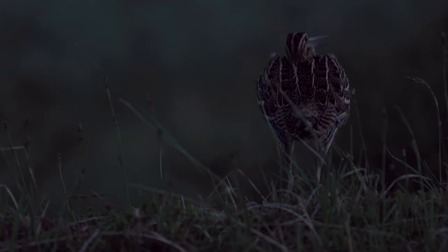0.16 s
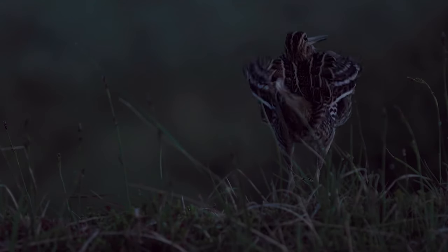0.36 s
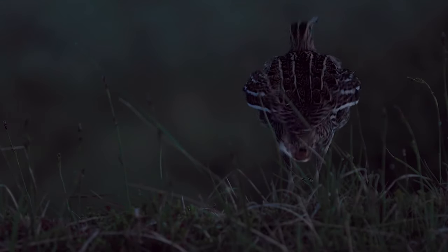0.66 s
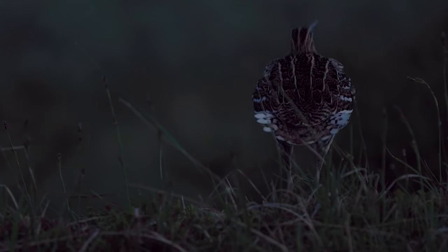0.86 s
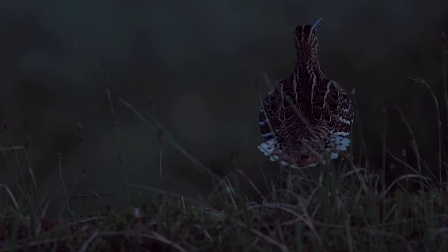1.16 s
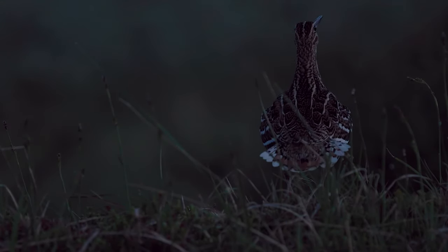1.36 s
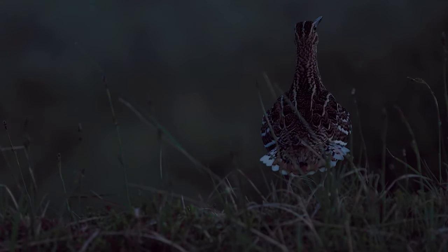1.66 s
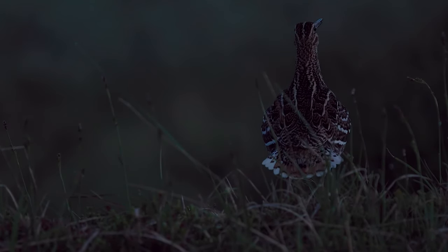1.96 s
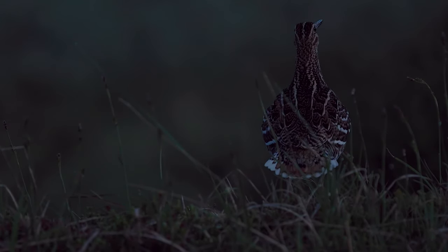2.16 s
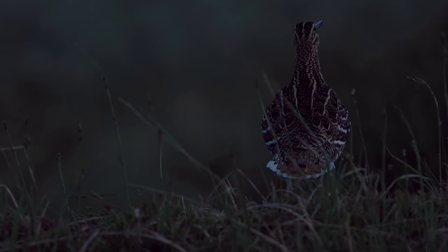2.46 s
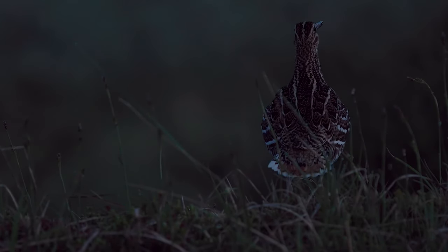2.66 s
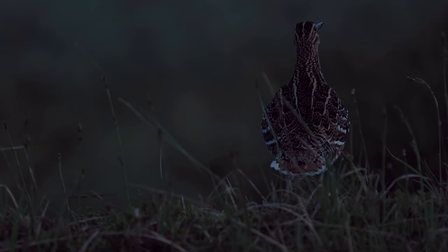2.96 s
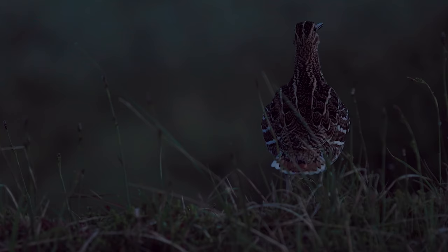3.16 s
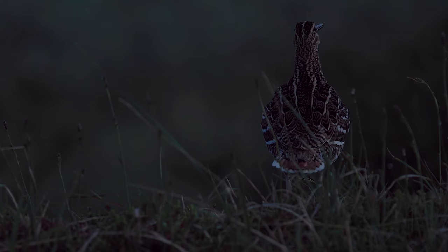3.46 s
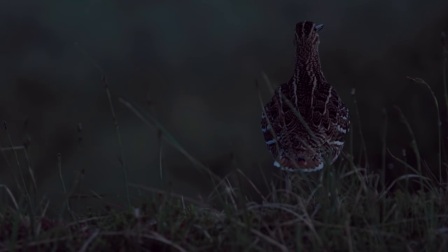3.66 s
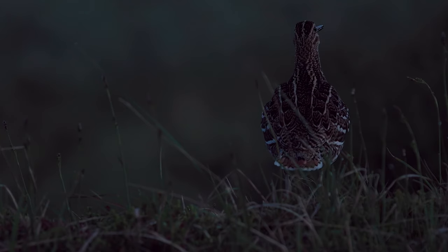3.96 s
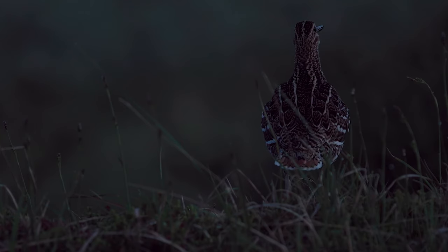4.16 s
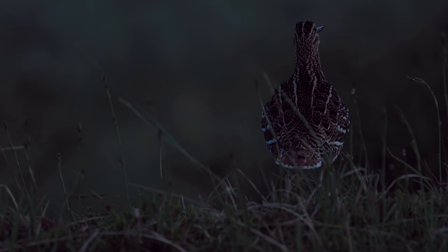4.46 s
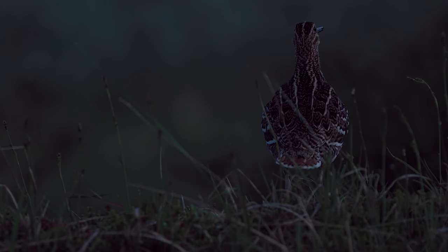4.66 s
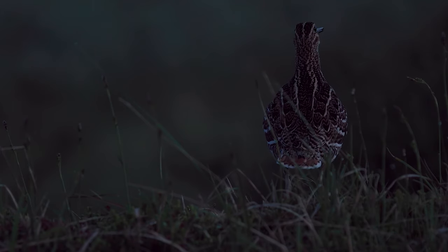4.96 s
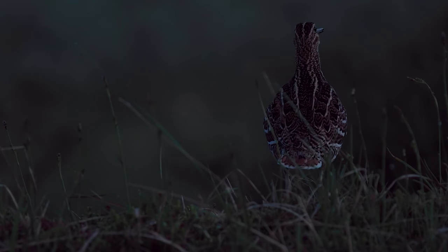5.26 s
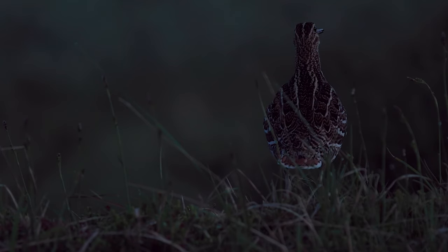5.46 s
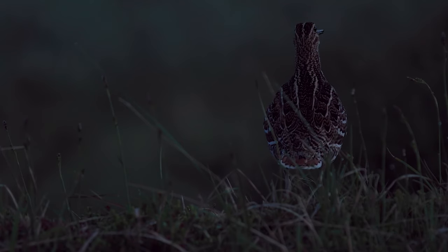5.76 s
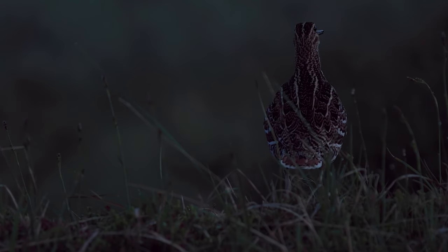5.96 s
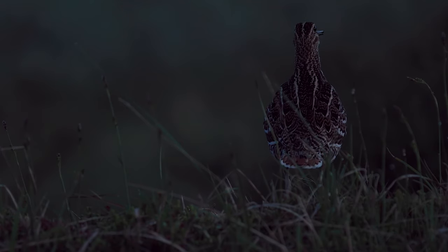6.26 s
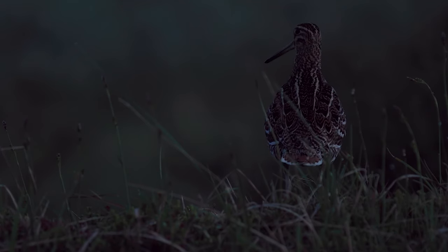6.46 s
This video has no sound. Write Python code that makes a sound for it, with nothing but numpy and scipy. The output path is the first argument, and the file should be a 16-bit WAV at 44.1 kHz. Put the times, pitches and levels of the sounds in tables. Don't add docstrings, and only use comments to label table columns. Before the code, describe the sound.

On an open mire at dusk, a long-billed wader already mid-song snaps dry, ringing clicks faster and faster, then a quick triplet, one last snap, chirps and a thin warble. A second and third male repeat the accelerating bout, with gulps and low chest beats. Far twittering thins, a low breeze rises, and a softer bout of clicks comes last. Two spaced microphones give wide stereo.

```python
import sys
import numpy as np
from scipy import signal
from scipy.io import wavfile
from scipy.ndimage import uniform_filter1d, minimum_filter1d

SR = 44100
rng = np.random.default_rng(int(sys.argv[2]) if len(sys.argv) > 2 else 0)


def pcm_store(signal):
    levels = np.round(np.clip(np.atleast_2d(signal), -1, 1) * 32767)
    wavfile.write(sys.argv[1], SR, levels.astype(np.int16).T)


def volts_from_decibels(level):
    exponent = np.asarray(level, float) / 20
    return 10 ** exponent


N = 291489

# (t/s, rumble level/dB, far chorus level/dB)
ACTIVITY = [(0, -39, -38), (.47, -40.5, -42.5), (.9, -45, -39.5), (1.3, -43, -40), (1.6, -50.5, -40),
            (2.65, -49, -44), (2.9, -42, -45.5), (3.15, -48.5, -41), (3.4, -43, -44.5), (3.9, -50.5, -55.5),
            (4.1, -44, -51.5), (4.599, -50.5, -59), (5.1, -44.5, -58), (5.3, -36.5, -51.5),
            (5.6, -39.5, -49), (5.85, -36, -44), (6.2, -44, -48.5), (6.61, -43.5, -58)]
# (f/Hz, level/dB)
RUMBLE = [(35, -47), (60, -8), (120, 1.8), (270, -13), (450, -33.5), (700, -60)]
BREEZE = [(12, 10), (28, 15), (60, -4), (120, -41.5)]
HISS = [(210, 3), (350, -1.5), (613, -3.5), (1140, -1), (1940, -10), (2980, -6.5), (5750, -27.5),
        (16000, -27)]
CHORUS = [(1500, -28), (2500, -5), (4000, 0.5), (5500, -8), (8000, -18), (13000, -26)]
HISS_DB = -53

# (t/s, peak level/dB)
BEATS = [(0.014, -29.5), (0.068, -30), (0.095, -28), (0.144, -30), (0.168, -29.5), (0.194, -28),
         (0.271, -28), (0.321, -28), (0.369, -30), (0.395, -27), (0.535, -39), (0.575, -30), (0.671, -28),
         (0.735, -29), (0.761, -30), (0.821, -34), (0.847, -33), (0.899, -36), (0.972, -34), (1.036, -36),
         (1.081, -35), (1.143, -34), (1.188, -33.5), (1.231, -33), (1.262, -30), (1.398, -38), (1.462, -32),
         (1.496, -36), (1.76, -40), (1.846, -33), (1.947, -41), (2.008, -33), (2.146, -31.5), (2.268, -33),
         (2.338, -44), (2.374, -33), (2.465, -33), (2.531, -40), (2.555, -33), (2.612, -41), (2.64, -38),
         (2.687, -40), (2.712, -37), (2.753, -36), (2.812, -32), (2.911, -37), (3.072, -40)]
THUD_HZ, THUD_DB = 105, -32

# (t/s, length/s, from f/Hz, to f/Hz, level/dB)
LEFT = [(1.145, 0.034, 3700, 3410, -38.5), (1.548, 0.042, 3780, 3590, -38), (1.491, 0.03, 4750, 4100, -37),
        (0.74, 0.052, 4100, 3620, -45), (0.871, 0.036, 2900, 2720, -46), (0.913, 0.023, 5250, 4750, -44),
        (0.954, 0.016, 4950, 4350, -32), (0.965, 0.042, 2900, 2820, -44.5),
        (1.048, 0.047, 3200, 3070, -44.5), (1.407, 0.019, 3950, 4060, -32.5),
        (1.441, 0.009, 5050, 4300, -38), (1.458, 0.012, 4900, 4150, -39), (1.472, 0.015, 5200, 4450, -31),
        (1.499, 0.03, 1860, 1876, -49), (1.655, 0.02, 2000, 1890, -50), (1.696, 0.015, 5600, 4340, -31.5),
        (1.709, 0.046, 2850, 2460, -46), (1.712, 0.048, 1960, 1850, -52), (.23, .035, 2450, 2350, -49),
        (.316, .04, 2850, 2700, -46), (.12, .07, 2300, 1950, -49), (.605, .02, 4950, 4850, -44),
        (1.405, .06, 2700, 2650, -49), (2.97, .04, 2700, 2700, -52), (3.15, .05, 3200, 2750, -54),
        (1.923, 0.025, 2080, 1920, -50), (1.972, 0.018, 3750, 3970, -41), (1.63, 0.02, 4150, 4040, -37.5),
        (1.658, 0.08, 4050, 4260, -38), (1.89, 0.028, 3950, 4100, -38), (1.889, 0.049, 3050, 2930, -42.5),
        (2.8, 0.04, 3950, 4000, -51), (3.715, 0.06, 4650, 4700, -57), (0.305, 0.013, 4500, 4150, -30.5),
        (0.404, 0.011, 5300, 4850, -32), (0.025, 0.038, 3650, 4050, -38), (0.18, 0.021, 3080, 3320, -45),
        (3.873, .117, 3170, 3044, -51.5), (4.292, 0.11, 2655, 2770, -51)]
AHEAD = [(.372, 0.055, 2220, 2250, -40), (0.409, 0.046, 3350, 3000, -37.5), (3.675, 0.063, 3800, 3930, -47),
         (3.845, 0.059, 3820, 3830, -49.5), (5.016, 0.043, 3790, 3700, -50.5),
         (5.088, 0.026, 4380, 4100, -49.5), (5.158, .034, 4700, 4260, -50.5),
         (5.617, 0.031, 4000, 3960, -44.5), (5.768, 0.02, 5000, 4700, -41), (5.2, .06, 3250, 2900, -50),
         (5.31, 0.1, 4020, 4660, -55), (3.8, 0.049, 3300, 3000, -55), (6.02, 0.035, 2900, 2570, -55),
         (6.09, 0.02, 3100, 3150, -48), (6.53, 0.015, 3150, 3400, -50), (6.56, 0.022, 3280, 3130, -43),
         (6.19, 0.013, 5300, 4650, -45), (6.076, 0.026, 5000, 4770, -46), (6.208, 0.02, 4850, 4550, -47),
         (6.53, 0.035, 4500, 4430, -52)]
RIGHT = [(1.478, 0.081, 3240, 2700, -46), (1.951, 0.3, 3310, 3160, -57), (2.142, 0.22, 3250, 3170, -51),
         (2.538, 0.038, 4600, 4150, -53), (2.6, 0.048, 4500, 4300, -48), (.48, .05, 2700, 2800, -51),
         (5.73, .14, 2450, 2400, -58), (2.92, .04, 4330, 4180, -48), (2.98, 0.07, 3850, 3650, -54),
         (2.7, 0.047, 2700, 2800, -52), (3.445, 0.055, 3400, 2950, -54.5), (3.325, 0.053, 4400, 4700, -53),
         (3.24, 0.025, 4900, 4750, -47), (3.99, 0.06, 2950, 2400, -54.5), (3.915, 0.035, 4050, 3950, -54),
         (4.005, 0.025, 3950, 3550, -55), (3.5, 0.035, 3850, 3600, -55), (4.3, 0.04, 4400, 4000, -58),
         (4.035, 0.028, 1820, 1820, -54), (3.615, 0.018, 5200, 4900, -48), (3.575, 0.071, 4400, 3700, -46),
         (3.311, .11, 1750, 1710, -50.5), (3.199, 0.1, 3300, 2900, -55), (3.941, 0.062, 3890, 3860, -47.5),
         (4.194, 0.059, 3790, 3850, -48), (4.394, 0.063, 4130, 3900, -46.5),
         (6.21, 0.062, 3360, 3100, -52.5)]
FAR_RIGHT = [(4.661, 0.073, 3900, 3770, -52), (4.739, .25, 2140, 2000, -58), (4.75, 0.24, 4230, 3960, -62),
             (4.765, 0.075, 3450, 3550, -61), (4.82, 0.12, 3370, 3480, -62),
             (4.845, 0.065, 2940, 2920, -63), (4.94, 0.053, 3150, 2910, -63),
             (4.67, 0.045, 2850, 2790, -61), (4.299, 0.19, 3130, 3340, -62), (5.13, 0.065, 3750, 3680, -52),
             (5.3, 0.07, 2730, 2350, -52.5), (5.37, 0.15, 2375, 2310, -53), (5.62, .04, 4320, 4280, -47),
             (5.93, .065, 2700, 3450, -52), (5.75, .025, 4250, 3950, -47), (5.88, .03, 4350, 4000, -47),
             (5.78, .03, 3450, 3200, -52), (5.81, .04, 3250, 3700, -55), (6.16, .03, 4230, 4330, -55),
             (5.475, 0.055, 3000, 2700, -58), (5.53, 0.06, 2960, 3550, -60), (5.457, .054, 3980, 3850, -55),
             (5.574, 0.074, 2280, 2160, -58), (5.799, .15, 1980, 1860, -62.5),
             (5.896, 0.093, 5000, 5110, -43.5), (6.318, 0.065, 3300, 3060, -51.5),
             (6.45, .12, 2180, 2190, -60)]
NOTE_LAGS = (28, 8.5, -13, -27)
NOTE_ARCH, LONG_NOTE_S = 0.0459, .095
PAN_DB_PER_LAG = 0.2872

# (right microphone lag/samples, snap left over right/dB, bill brightness/dB,
# gulp level/dB, flourish level/dB)
MALES = [
    (3.003, 5.5, -32, -14, -1.5),
    (11.75, 13, 2, -20, -1.5),
    (26.67, 17.5, -1.5, -26, -3.5),
]
# (t/s, throat ring f/Hz, level/dB)
FIRST_BOUT = [
    (0.0712, 4560, -12),
    (0.1456, 4430, -12),
    (0.2124, 4070, -13),
    (0.2717, 3700, -14.5),
    (0.3229, 2080, -25.5),
    (0.4446, 4770, -13.5),
    (0.4679, 5100, -16.5),
    (0.4861, 4870, -17),
    (0.5837, 4230, -10),
]
SECOND_BOUT = [(0.1294, 4310, -14), (0.282, 4940, -9.5), (0.417, 5360, -7), (0.538, 5790, -8),
               (0.642, 5750, -7), (0.7355, 5520, -10), (0.8221, 5270, -9.5), (0.9014, 5150, -9.5),
               (0.974, 4840, -13.5), (1.0374, 4530, -14.5), (1.094, 4070, -18), (1.1446, 2480, -28.5),
               (1.1907, 1610, -56), (1.2332, 2000, -54), (1.265, 5680, -13.5), (1.287, 5070, -21.5),
               (1.3044, 4940, -21), (1.403, 4230, -15.5)]
THIRD_BOUT = [(1.6315, 4230, -36), (1.7614, 3920, -13.5), (1.9482, 4300, -12), (2.0953, 4810, -10),
              (2.2251, 5170, -9), (2.341, 5460, -8.5), (2.4402, 5330, -8), (2.5311, 5080, -9.5),
              (2.6147, 4830, -12), (2.6901, 4530, -15), (2.7572, 4260, -17.5), (2.8153, 3730, -20),
              (2.8673, 2680, -23.5), (2.914, 1900, -39.5), (2.9561, 2110, -45.5), (2.989, 5150, -15.5),
              (3.011, 4930, -25), (3.0287, 4790, -22.5), (3.1298, 5300, -16)]
FOURTH_BOUT = [(5.219, 3980, -29), (5.4155, 4250, -27), (5.5672, 4680, -26.5), (5.7021, 4930, -25.5),
               (5.8238, 5220, -27), (5.932, 5500, -30.5), (6.0299, 5240, -26.5), (6.119, 5040, -28.5),
               (6.202, 4900, -29), (6.278, 4600, -31), (6.3467, 4200, -33), (6.4087, 3900, -34),
               (6.4623, 2700, -45)]
STRAY_SNAPS = [
    (5.684, 2080, -29.5),
    (5.7238, 1845, -37),
]
SINGERS = [
    (0, -3, 0, .76, 1.055),
    (1, 4, 0, 1.612, .955),
    (2, 5, 2, 3.33, 1),
    (0, 5, 2, None, 1),
    (1, -9, 0, None, 1),
]
CRACK_DB = [-5, -2.5, -6.5, -28, -14.5]
# (slope/dB per kHz), zero at 4.5 kHz
CRACK_DB_PER_KHZ = [-1.5, -4.5, -3]
GAPE_UNDER_HZ, GAPE_DB_PER_SNAP = 3000, -3.0
LEAD_S = .0006

FILL, STOP_S, LONGEST_WAIT_S = .47, .011, 0.15
LEAD_DB = [-31, -20.5, -21.5, -22.5, -20]
TURN = (0.33, 0.58)
SLIDE, HOOK, SAG = (1.0, 1.0, 1.055), (1.04, .9, 1.085), (0.975, 0.99, 1.005)
HOOK_HZ, SAG_PER_SNAP, SAG_DB_PER_SNAP = 4600, 0.062, -3.2
SWELL_DB = 4
TOP = [(1.07, 0.91, 1.11), (1.16, 0.97, 1.11), (1.05, 0.93, 1.14)]
DROP = [(1.14, 1.02, 1), (1.0, 0.97, 0.95), (1.17, 1.04, 1)]

# (t/s, peak level/dB)
GULPS = [(0.166, -33.5), (0.31, -33.5), (0.361, -36), (0.384, -28.5), (0.403, -36), (0.421, -30.5),
         (0.549, -35.5), (0.654, -31.5), (0.685, -29.5), (0.745, -34.5), (0.831, -35.5), (0.91, -36.5),
         (1.202, -39), (1.221, -35.5), (1.24, -36.5), (1.47, -34), (1.504, -36), (1.585, -37), (1.777, -35),
         (1.992, -35.5), (2.134, -37.5), (2.879, -37), (3.078, -40), (5.261, -42), (5.328, -42),
         (5.686, -40.5), (5.9, -47), (2.691, -41)]
LATE_S, LATE_TUNE = 5, 1.8

# (t/s from it, length/s, from f/Hz, to f/Hz, level/dB)
CHIRPS = [
    (-.089, .07, 7010, 4510, -33.5),
    (-.03, 0.022, 5560, 5870, -30),
    (.047, 0.017, 6640, 4280, -35.5),
    (0.063, 0.012, 5390, 4350, -39.5),
    (.081, 0.019, 4740, 6480, -36.5),
    (.148, 0.013, 5970, 5450, -33.5),
    (0.159, .034, 5220, 5160, -35),
]
# (t/s from its start, f/Hz)
SWOOPS = [
    [(0, 3835), (.05, 3590), (.096, 5370), (.108, 5530), (.158, 5470), (.198, 4870), (.253, 3516),
     (.292, 3214)],
    [(.294, 2804), (.307, 2670), (.358, 3210), (.4, 3260), (.499, 2836), (.514, 2565), (.545, 2770),
     (.557, 2460)],
]
SWOOP_DB, PIP_DB = (-49.5, -47.5), (-44, -47.5, -55)
PIP_S, PIP_GAP_S, PIP_LENGTH_S, PIP_HZ = .565, 0.063, 0.044, (2424, 2680)
DB_PER_KHZ = 5
UNDER, UNDER_DB = .755, -4.5
UNDER_REST_S = .11, .225

# (t/s, ring f/Hz, peak level/dB)
BACK_SNAPS = [(1.046, 5020, -29), (1.147, 5550, -25.5), (1.414, 7600, -41), (1.435, 7440, -43),
              (1.5482, 5850, -26.5), (1.593, 7940, -43), (1.6294, 6800, -33.5), (1.701, 7180, -35),
              (5.234, 3860, -43), (5.643, 6000, -46), (5.7618, 5600, -44), (5.9883, 5900, -46),
              (6.0936, 6000, -52), (6.2502, 6000, -47)]


def evened(x):
    return x / np.sqrt(np.mean(x ** 2) + 1e-20)


def read(points, hz):
    f, value = np.transpose(points)
    return np.interp(np.log(hz + 1), np.log(f + 1), value)


def add(mix, s, sound, lag, pan_db):
    for channel, start, db in zip(mix, (s * SR, s * SR + lag), (pan_db / 2, -pan_db / 2)):
        part = channel[max(round(start), 0):][:len(sound)]
        part += volts_from_decibels(db) * sound[:len(part)]


def noise(spectrum, same, patchy_db, size):
    frames, hz = 4 * N // size + 5, np.fft.rfftfreq(size, 1 / SR)
    a, b, c, d, patches = rng.standard_normal((frames, len(hz), 5)).T
    patches = uniform_filter1d(patches, size=8, axis=0)
    patches = evened(uniform_filter1d(patches, size=6, axis=1))
    same = np.clip(same, 0, 1)
    left = a + 1j * b
    right = same * left + np.sqrt(1 - same ** 2) * (c + 1j * d)
    z = np.array([left, right]) * volts_from_decibels(read(spectrum, hz)[:, None] + patchy_db * patches)
    return evened(signal.istft(z, nperseg=size, noverlap=size - size // 4)[1][:, :N])


def whistle(db, points, flutter_db=0.9, wobble=0.0073, edge_s=0.0024, breath_db=-15):
    s, hz = np.transpose(points)
    t = np.arange(s[0], s[-1], 1 / SR)
    chance = rng.standard_normal((5, len(t)))
    sway = evened(uniform_filter1d(chance[3:], size=900, axis=1))
    drift = evened(uniform_filter1d(chance[:2], size=150, axis=1))
    breath = evened(np.convolve(chance[2], np.hanning(24) ** 2, "same"))
    hz = uniform_filter1d(np.interp(t, s, hz), size=380, mode="nearest")
    hz = hz * (1 + wobble * drift[0] + 0.00595 * sway[0])
    edges = np.clip(np.minimum(t - s[0], s[-1] - t) / edge_s, 0, 1)
    tone = (1 + volts_from_decibels(breath_db) * breath) * np.sin(2 * np.pi * np.cumsum(hz) / SR)
    return np.sqrt(2) * volts_from_decibels(db + flutter_db * drift[1] + 1.44 * sway[1]) * edges * tone


def ring(hz, db, t60, rise_s, delay_s=0.0):
    t = np.maximum(np.arange(900) / SR - delay_s, 0)
    mode = volts_from_decibels(db - 60 * t / t60) * (1 - np.exp(-t / rise_s)) * np.sin(2 * np.pi * hz * t)
    return signal.lfilter(*signal.butter(2, 0.3 * hz, "highpass", fs=SR), mode)


def thumps(per_s=70, spread_db=2.5):
    hits = (rng.random(N) < per_s / SR) * volts_from_decibels(spread_db * np.minimum(rng.exponential(1, N), 4))
    kind, u = rng.integers(0, 3, N), np.linspace(-3, 3, 600)
    push = np.zeros(N)
    for k, w in enumerate((1.1, 1.7, 2.6)):
        shape = ((w * u) ** 2 - 1) * np.exp(-(w * u) ** 2 / 2)
        push += signal.oaconvolve(hits * (kind == k), shape)[:N]
    return evened(np.array([push, 1.04 * np.roll(push, 14)]))


def ground_rumble(t):
    s, rumble_db, chorus_db = np.transpose(ACTIVITY)
    rumble = volts_from_decibels(np.interp(t, s, rumble_db) - 1.0) * noise(RUMBLE, 0.83, 3.2, size=1024)
    rumble += volts_from_decibels(0.68 * np.interp(t, s, chorus_db) - 22.0) * thumps()
    return rumble * volts_from_decibels([[.9], [-.9]])


def marsh_air(t):
    breeze_db = -64.5 + 15 * np.clip((t - 4.4) / 0.48, 0, 1)
    breeze = volts_from_decibels(breeze_db) * noise(BREEZE, 0.19, 2.7, size=4096)
    return breeze + volts_from_decibels(HISS_DB) * noise(HISS, 0.014, 0.61, size=1024)


def chorus(count=300):
    mix = np.zeros((2, N))
    for u in rng.random((count, 7)):
        hz, length, lag = 1900 * 2.6 ** u[1], 0.015 + .06 * u[2] ** 2, 60 * u[5] - 30
        middle_hz, end_hz = hz * (.92 + 0.1564 * u[6]), hz * (.8 + 0.252 * u[3])
        points = [(0, hz), (length / 2, middle_hz), (length, end_hz)]
        glide = whistle(read(CHORUS, hz) + 4 * u[4] - 15, points)
        add(mix, u[0] * N / SR, glide, lag, PAN_DB_PER_LAG * lag)
        snap = ring(1.37 * hz, 6 * u[4] - 3, 0.0065, .0001)
        snap += ring(5000 + 6500 * u[3], 6 * u[4] - 15, 0.003, .00005)
        add(mix, u[6] * N / SR, snap, lag, PAN_DB_PER_LAG * lag)
    return evened(evened(mix) + 0.9 * noise(CHORUS, 0.12, 6.2, size=256))


def beats():
    mix, t = np.zeros((2, N)), np.linspace(-1, 1, 700)
    for (s, db), tune in zip(BEATS, rng.random(len(BEATS))):
        beat = np.hanning(len(t)) * np.cos(2 * np.pi * (1.68 + 0.5 * tune) * t)
        add(mix, s - 0.003, volts_from_decibels(db - 3.5) * beat, 10, 2.5)
    t = np.arange(-.025, .025, 1 / SR)
    thud = volts_from_decibels(THUD_DB) * np.hanning(len(t)) * np.cos(2 * np.pi * THUD_HZ * t)
    for snaps in FIRST_BOUT, SECOND_BOUT, THIRD_BOUT:
        add(mix, snaps[-3][0] + t[0], thud, 10, 2.5)
    return mix


def other_notes():
    mix = np.zeros((2, N))
    for notes, lag in zip((LEFT, AHEAD, RIGHT, FAR_RIGHT), NOTE_LAGS):
        for s, length, from_hz, to_hz, db in notes:
            arch = 1 + NOTE_ARCH * (length < LONG_NOTE_S)
            points = [(0, from_hz), (length / 2, arch * (from_hz + to_hz) / 2), (length, to_hz)]
            add(mix, s, whistle(db - 0.5, points, edge_s=0.0082), lag, PAN_DB_PER_LAG * lag)
    return mix


def gulp(db, tune):
    t = np.linspace(-1, 1, 560)
    turns = 3.017 * (0.9 + 0.24 * tune) * (t - 0.14 * t ** 2)
    return volts_from_decibels(db) * np.hanning(len(t)) * np.cos(2 * np.pi * turns)


def bill_crack(db):
    crack = ring(6050, db + 4, 0.0022, .0001, LEAD_S) + ring(2700, db - 13, 0.0059, .00006, LEAD_S)
    return crack + ring(6200, db - 11, .002, .0001, .00015)


def bill_edge(db):
    edge = ring(9560, db - 7.5, 0.0016, .00004, LEAD_S)
    edge -= ring(8150, db - 6.5, 0.0017, .00004, LEAD_S)
    return edge - ring(12300, db - 18.0, 0.0044, .00004, LEAD_S)


def lead_in(s, wait, ring_hz, db, past, male):
    if past == 0:
        shape = TOP[male]
    elif past == 1:
        shape = DROP[male]
    elif past > 1:
        shape = SAG
    else:
        shape = HOOK if ring_hz > HOOK_HZ else SLIDE
    hz = ring_hz * (1 - SAG_PER_SNAP * max(past - 1, 0)) * np.array([*shape, shape[-1]])
    times = s - STOP_S - FILL * wait * (1 - np.array([0, *TURN, 1]))
    sound = whistle(db + SAG_DB_PER_SNAP * max(past, 0), np.transpose([times, hz]))
    swell_db = np.interp(np.linspace(0, 1, len(sound)), TURN, (-SWELL_DB * (past < 1), 0))
    return times[0], sound * volts_from_decibels(swell_db)


def near_males():
    mix = np.zeros((2, N))
    bouts = FIRST_BOUT, SECOND_BOUT, THIRD_BOUT, FOURTH_BOUT, STRAY_SNAPS
    for snaps, singer, crack_db, lead_db in zip(bouts, SINGERS, CRACK_DB, LEAD_DB):
        male, top, first, warble_s, stretch = singer
        lag, snap_pan_db, bright_db, gulp_db, song_db = MALES[male]
        pan_db = PAN_DB_PER_LAG * lag
        waits = np.minimum(np.diff([s for s, _, _ in snaps], prepend=-1), LONGEST_WAIT_S)
        for k, (s, hz, ring_db) in enumerate(snaps):
            start = s - LEAD_S - .0001
            snap_db = ring_db + crack_db + CRACK_DB_PER_KHZ[male] * (hz / 1000 - 4.5)
            add(mix, s - .0144, gulp(snap_db + gulp_db, rng.random()), lag, pan_db)
            add(mix, start, bill_crack(snap_db), lag, snap_pan_db)
            add(mix, start, bill_edge(snap_db + bright_db), lag, 1.73 * snap_pan_db)
            throat = ring(hz, ring_db + 8.5, 0.0082, .00012, LEAD_S)
            if warble_s:
                full_gape = k == len(snaps) - 1 or hz < GAPE_UNDER_HZ
                gape_db = 0 if full_gape else GAPE_DB_PER_SNAP * (k - top + 4)
                throat += ring(6150, ring_db + gape_db + 14, 0.0036, .0006, LEAD_S)
            puff = ring(222, ring_db - 8.5, 0.013, 0.002, 0.003)
            add(mix, start, throat + puff, lag, pan_db)
            if first <= k < top + 6 and s - STOP_S > FILL * waits[k]:
                add(mix, *lead_in(s, waits[k], hz, ring_db + lead_db, k - top, male), lag, pan_db)
        if warble_s:
            for s, sound in flourish(snaps[-1][0], warble_s, stretch, song_db):
                add(mix, s, sound, lag, pan_db)
    return mix


def gulps():
    mix = np.zeros((2, N))
    for (s, db), (tune, side) in zip(GULPS, rng.random((len(GULPS), 2))):
        add(mix, s - 280 / SR, gulp(db - 1.5, tune if s < LATE_S else LATE_TUNE), 8, 2.5 * side)
    return mix


def flourish(last_s, warble_s, stretch, db):
    sounds = []
    for s, length, from_hz, to_hz, level in CHIRPS:
        sounds.append((last_s + s, whistle(level + db, [(0, from_hz), (length, to_hz)])))
    pip_starts = [PIP_S + k * PIP_GAP_S for k in range(3)]
    pips = [[(s, PIP_HZ[0]), (s + PIP_LENGTH_S, PIP_HZ[1])] for s in pip_starts]
    for level, points in zip(SWOOP_DB + PIP_DB, SWOOPS + pips):
        points = np.array(points) * [stretch, 1]
        upper = whistle(level + db, points)
        under = whistle(level + db + UNDER_DB, points * [1, UNDER])
        t = points[0][0] + np.arange(len(under)) / SR
        rest = np.clip(np.maximum(UNDER_REST_S[0] - t, t - UNDER_REST_S[1]) / 0.0054, 0, 1)
        effort = volts_from_decibels(DB_PER_KHZ * (np.interp(t, *points.T) / 1000 - 3))
        sounds.append((warble_s + points[0][0], effort * (upper + rest * under)))
    return sounds


def back_snaps():
    mix = np.zeros((2, N))
    for (s, hz, db), rasp in zip(BACK_SNAPS, rng.standard_normal((len(BACK_SNAPS), 900))):
        rasp = np.diff(uniform_filter1d(rasp, size=3), prepend=0)
        rasp = rasp * abs(ring(300, db - 2.5, 0.03, 0.001)) * (hz / 7000) ** 4
        add(mix, s, ring(hz, db + 9.0, 0.012, 0.0012) + rasp, 18, 6.0)
    return mix


def mire(x, t60=0.09):
    taps = (rng.random((2, 12000)) < .05) * rng.standard_normal((2, 12000))
    taps *= volts_from_decibels(-60 * np.arange(12000) / SR / t60) * (np.arange(12000) > 150)
    dull = signal.sosfilt(signal.butter(1, [2500, 9000], "bandpass", fs=SR, output="sos"), x)
    return signal.oaconvolve(dull, taps / np.linalg.norm(taps[0]), axes=1)[:, :N]


def scene():
    t = np.arange(N) / SR
    s, _, chorus_db = np.transpose(ACTIVITY)
    ground = ground_rumble(t) + marsh_air(t)
    far = volts_from_decibels(np.interp(t, s, chorus_db) - 4.8) * chorus()
    chests = beats()
    near = other_notes() + near_males()
    tail = volts_from_decibels(-20) * mire(near + 3.0 * far)
    return ground + far + chests + near + gulps() + back_snaps() + tail


def starved(x, loud_db=-36.0, share=0.95, edge_hz=7400):
    hz, _, z = signal.stft(x, SR, nperseg=256, noverlap=192)
    power = abs(z) ** 2
    treble = power[:, hz > edge_hz].sum((0, 1))
    loudest = -minimum_filter1d(-treble, size=35, origin=4)
    after = loudest > volts_from_decibels(loud_db) ** 2
    local = uniform_filter1d(uniform_filter1d(power, size=4, axis=1), size=3, axis=2)
    around = uniform_filter1d(uniform_filter1d(power, size=9, axis=1), size=7, axis=2)
    lost = (local < share * around) & after & (hz[:, None] > edge_hz)
    return signal.istft(z * ~lost, SR, nperseg=256, noverlap=192)[1][:, :N]


def top_cut(x):
    return signal.sosfilt(signal.butter(12, 16200, fs=SR, output="sos"), x)


def record(dry):
    heard = signal.sosfilt(signal.butter(20, 15600, fs=SR, output="sos"), dry)
    mix = np.clip(starved(heard), -1, 1)
    return top_cut(mix)


dry = scene()
out = record(dry)
pcm_store(out)
```